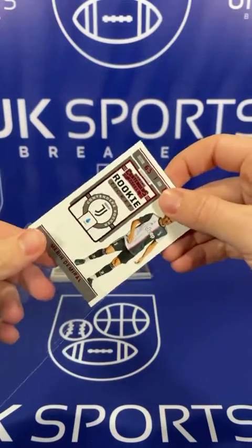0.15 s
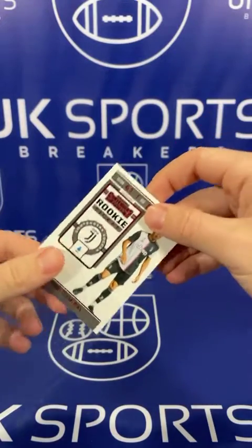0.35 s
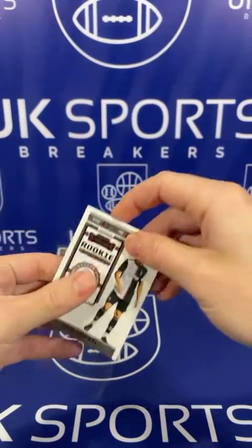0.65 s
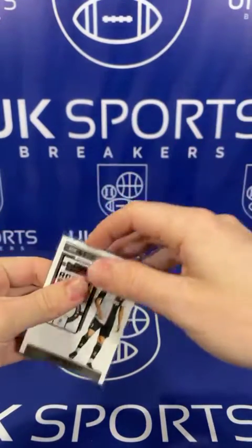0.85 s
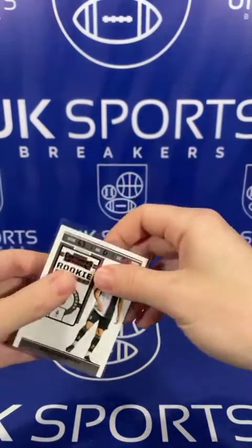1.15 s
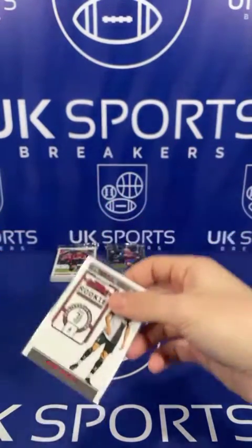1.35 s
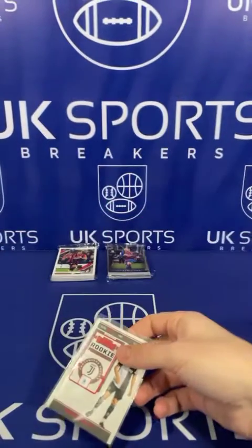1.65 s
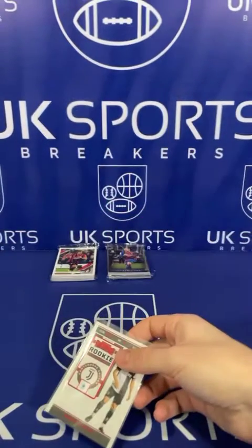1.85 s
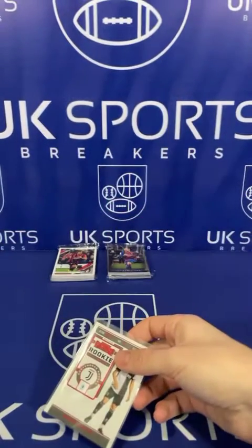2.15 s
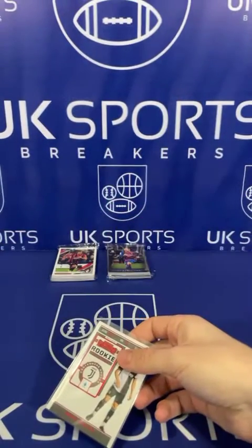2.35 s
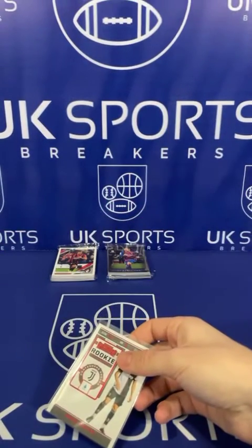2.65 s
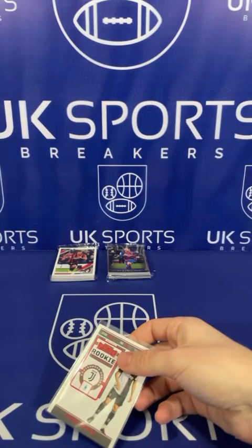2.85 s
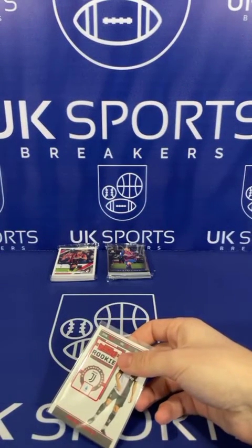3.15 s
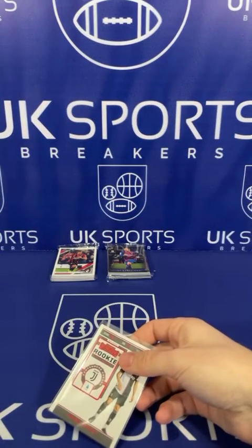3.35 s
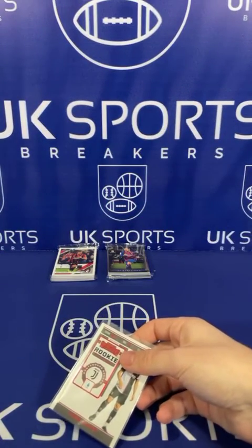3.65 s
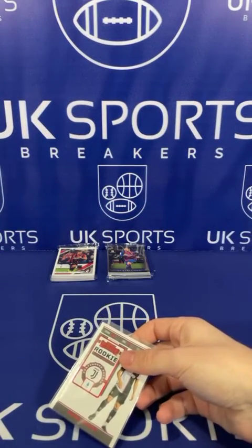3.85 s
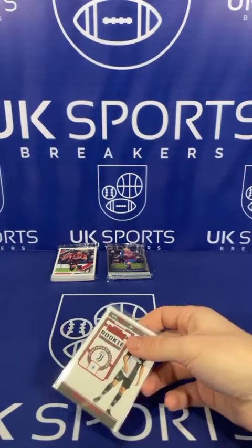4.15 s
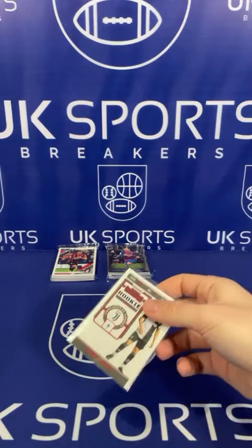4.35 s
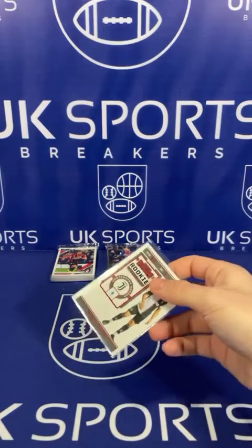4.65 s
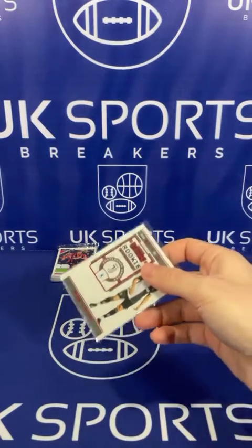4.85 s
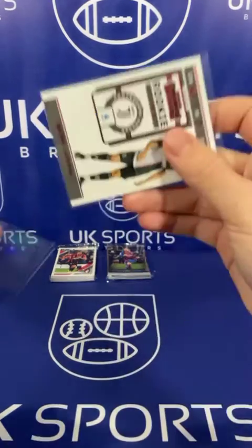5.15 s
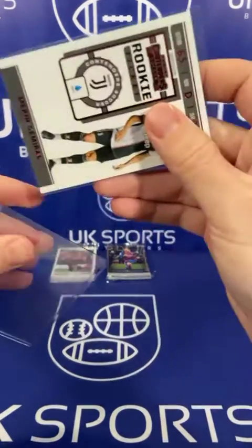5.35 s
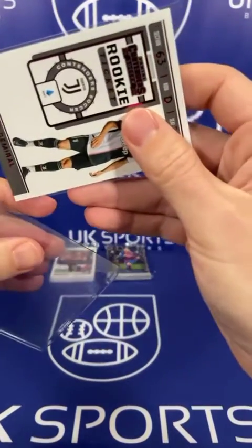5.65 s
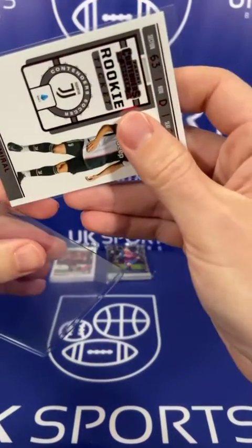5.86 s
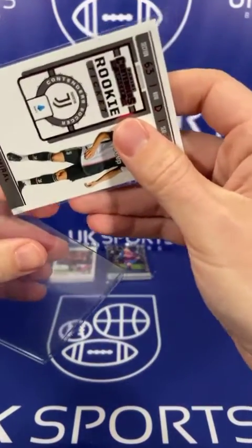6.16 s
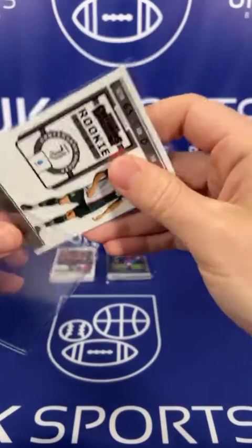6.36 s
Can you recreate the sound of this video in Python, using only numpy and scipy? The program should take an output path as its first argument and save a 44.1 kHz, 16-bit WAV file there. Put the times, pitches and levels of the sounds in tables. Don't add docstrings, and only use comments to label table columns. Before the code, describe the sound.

A small quiet room with faint vent air, soft hiss, mains hum and low rumble throughout; hands work close to a small microphone. From 0 to 1.2 s a card in a soft sleeve gives scattered dry ticks, the clearest near 0.3, 0.85 and 1.0, with thin film crackle and brief airy sweeps. A lull, then from 1.7 to 2.5 s denser clicks, rustling and dull desk knocks, strongest at 2.0, as stacked rigid holders are searched. At 2.87 s a firm click leads to a very loud, bright plastic snap at 2.98, with a short room echo. Tiny ticks follow until 3.6-3.8 s, when a rough scrape drops in pitch with clustered clacks. Around 4.4-5.0 s come set-down taps, soft rubbing and sleeve glide, then small ticks near 5.4. Near quiet follows, with light rubs and sweeps from 6.15 and crisp final ticks at 6.42 and 6.49.

```python
import sys
import numpy as np
from scipy import signal
from scipy.fft import rfft, irfft, next_fast_len
from scipy.io import wavfile
from scipy.ndimage import map_coordinates

SR = 44100
rng = np.random.default_rng(int(sys.argv[2]) if len(sys.argv) > 2 else 0)


def gain_from_db(level_db):
    decades = np.asarray(level_db, float) / 20
    return 10 ** decades


def dump(signal):
    limited = np.clip(np.atleast_2d(signal).T, -1, 1)
    pcm = np.round(limited * 32767).astype(np.int16)
    wavfile.write(sys.argv[1], SR, pcm)


N = 286650

# start_s, peak_db, top_end_db, ring_hz
CARD_TICKS = [(.1428, -37.5, -20.5, 1090), (.163, -45, -13, 1530), (.1705, -42, -24, 1460),
              (.1893, -39.5, -10.5, 1130), (.2897, -29.5, -10, 1536), (.444, -38.5, -9, 3930),
              (.4914, -40, -14, 1820), (.6087, -36.5, -7, 1140), (.7528, -42, -13, 2140),
              (.8514, -28, 0, 2170), (.861, -37.5, -21.5, 1175), (1.0007, -29.5, -3.5, 2610),
              (1.0184, -38, -0.5, 2800), (1.1262, -34, -9.5, 1100), (1.1408, -35.5, -3.5, 1510),
              (4.3923, -36, -14, 1345), (4.5428, -34.5, -11, 4700), (4.572, -35.5, -5, 5770),
              (4.6778, -42, -2.5, 1180), (4.8163, -40.5, -15, 2650), (4.912, -39.5, -12, 3940),
              (4.925, -38, -20, 3886), (4.9541, -38, -32, 1293), (5.3857, -42, -20.5, 3500),
              (5.392, -45, -23, 4800), (6.4245, -36, -15, 1520), (6.4914, -29.5, -12.5, 2600)]
# start_s, peak_db, top_end_db, ring_hz
STACK_TICKS = [(1.7199, -29, -13, 1098), (1.7615, -39, -15, 1510), (1.8153, -40.5, -37, 903),
               (1.8425, -37, -33, 1086), (1.8554, -41.5, -31, 1516), (1.9455, -39.5, -25, 2480),
               (1.9755, -37.5, -10, 2500), (1.9984, -24, -15, 940), (2.0325, -35, -8, 2080),
               (2.0641, -29, -33, 2550), (2.139, -43.5, -11, 920), (2.1626, -59, -39, 905),
               (2.385, -52.5, -24, 1000), (2.4098, -47, -37, 1900), (2.438, -47, -43, 900),
               (2.4771, -41, -51, 935), (2.5008, -49.5, -34, 1030), (2.7871, -50.5, -7, 2170)]
# start_s, peak_db, top_end_db, ring_hz
PRISE_TICKS = [(2.866, -18.5, -15.5, 1617), (2.9074, -30, -13, 882), (2.931, -32.5, -3, 1280),
               (2.974, -27, -24, 1900), (2.9816, -7, -10, 2237), (2.992, -15, -29.5, 2315),
               (3.1847, -44.5, -18, 2190), (3.2443, -58, 15.5, 2180), (3.544, -45.5, -22.5, 1174),
               (3.5895, -46, -18.5, 1695), (3.6298, -45, -25, 2850), (3.6343, -43, -10, 1840),
               (3.6676, -25.5, -26, 1305), (3.6862, -28.5, -39, 1306), (3.7085, -35, -35, 1160),
               (3.7275, -29.5, -20, 1270), (3.7518, -25, -26, 1804), (3.87, -35.5, -49, 1150),
               (3.8762, -39, -35, 1938), (3.8824, -40, -33, 1920), (3.9796, -40.5, -17, 924),
               (4.4617, -34.5, -45, 1277), (4.5036, -26, -24, 1736), (4.5132, -32.5, -27, 1158),
               (4.5196, -31, -20, 1346), (4.5295, -41, -28, 3034), (4.599, -45.5, -35, 1290)]
# freq_hz, gain_db
TICK_BODY = [(300, -27), (800, -1.5), (1300, 3), (2300, 4), (5000, -3), (8000, -16.5)]
# freq_hz, gain_db
TICK_TOP = [(2500, -36.5), (6000, -4.5), (8000, 2), (10500, -4.5), (14000, -4.5), (16000, -12)]
# start_s, peak_db, board_tone_hz
THUDS = [(0.29, -51, 384), (0.851, -46.5, 268), (1.004, -49, 490), (1.128, -48.5, 300), (1.722, -33.5, 475),
         (1.764, -34, 320), (1.784, -47, 295), (1.813, -44, 480), (1.841, -39, 490), (1.999, -28.5, 483),
         (2.031, -40, 486), (2.415, -46.5, 313), (2.478, -49, 307), (2.868, -28.5, 520.5),
         (2.885, -38.5, 496), (2.87, -38.5, 390), (2.987, -28, 493), (2.991, -29.5, 320),
         (2.998, -37.5, 139), (2.872, -38.5, 94), (3.729, -32.5, 344), (3.753, -32, 340),
         (3.872, -34.5, 650), (4.464, -35.5, 296), (4.502, -37, 265), (4.516, -33.5, 307),
         (4.535, -42, 222), (4.598, -45, 176), (4.472, -39, 121), (4.955, -42.5, 270), (5.305, -44.5, 42),
         (5.385, -52.5, 292), (5.438, -50.5, 370)]
# freq_hz, width_hz, gain_db
DESK_MODES = [(96.2, 37, -2.5), (152.3, 28.3, 4.5), (311.7, 53, 0.5), (380, 64, -1), (472, 91, -1),
              (940, 200, -8)]
# start_s, stop_s, start_db, stop_db
SWEEPS = [(0.401, 0.582, -59.5, -53.5), (0.596, 0.622, -55, -51.5), (0.743, 0.854, -60.5, -49),
          (0.85, 0.88, -49, -65), (1.114, 1.165, -60, -63), (3.608, 3.813, -66.5, -68),
          (4.241, 4.296, -61, -53), (4.896, 4.94, -62.5, -41.5), (5.594, 5.617, -74, -71.5),
          (6.26, 6.345, -68.5, -56.5), (6.332, 6.435, -58.5, -56.5), (6.428, 6.472, -70, -64)]
# start_s, stop_s, start_db, stop_db
RUBS = [(0.217, 0.291, -80, -50.5), (0.287, 0.408, -56, -68.5), (1.624, 1.655, -70, -58),
        (1.709, 1.948, -65, -66), (1.924, 2.127, -81.5, -61), (2.858, 2.862, -33, -39),
        (2.874, 2.932, -54.5, -53), (4.036, 4.158, -64, -64), (4.153, 4.224, -63, -61),
        (4.326, 4.349, -57.5, -46.5), (4.357, 4.447, -76, -60.5), (4.462, 4.476, -50.5, -44.5),
        (4.52, 4.668, -65.5, -63.5), (4.661, 4.806, -60.5, -62.5), (4.815, 4.92, -58, -66),
        (4.935, 4.968, -59, -65), (5.23, 5.251, -74, -60), (6.148, 6.27, -67, -67)]
# freq_hz, density_db_per_hz
STROKE_DULL = [(1500, -18), (3000, -4), (5000, 1), (7000, 2.5), (9000, 1.5), (12000, -24), (16000, -27)]
# freq_hz, density_db_per_hz
STROKE_BRIGHT = [(7000, -41), (10000, -4.5), (12500, -5.5), (14000, -2), (16000, -11)]
# start_s, strongest_s, stop_s, level_db
RUSTLES = [(0, 0, 0.26, -64), (0.474, 0.602, 0.58, -67), (.72, 0.737, 0.91, -66.5),
           (1.715, 1.786, 2.13, -59), (1.84, 1.85, 1.93, -60), (1.945, 1.964, 1.96, -55.5),
           (1.988, 2.017, 2.11, -53.5), (2.062, 2.09, 2.33, -64.5), (2.395, 2.441, 2.5, -63.5),
           (2.86, 2.97, 3, -75), (3.764, 3.775, 4.01, -49.5), (4.38, 4.513, 4.1, -73.5),
           (4.614, 4.72, 4.7, -65.5), (4.745, 4.79, 4.84, -68.5), (4.809, 4.836, 5.1, -61),
           (5.385, 5.403, 5.54, -63.5)]
# freq_hz, density_db_per_hz
FILM = [(290, -32), (500, 7), (588, 0), (1190, -0.5), (2170, -9), (2620, -7), (3360, -7), (3960, -7),
        (10000, -20), (13000, -47.5), (22000, -120)]
# freq_hz, width_hz, gain_db
HOLDER_MODES = [(970, 82, -4.5), (1900, 500, 9.5), (2600, 130, 4), (3700, 110, -5.5), (4960, 400, -18.5)]
# time_s, level_db, gap_resonance_hz
SCRAPE = [(3.61, -61.5, 1850), (3.63, -47, 1780), (3.65, -41, 1690), (3.667, -36.5, 1630),
          (3.683, -35.5, 1500), (3.69, -35.5, 1300), (3.73, -33, 1076), (3.745, -37, 1100),
          (3.758, -34, 1160), (3.785, -50, 1160), (3.82, -54, 1150), (3.86, -56, 1120),
          (3.875, -45.5, 1320), (3.95, -75, 1710)]
# freq_hz, density_db_per_hz
DRAG = [(240, -47), (400, -7), (655, -13), (879, -1), (1310, -15), (2360, -13), (3530, -21), (3990, -31.5),
        (8110, -23), (16000, -83)]
# freq_hz, width_hz, gain_db
RAIL_MODES = [(900, 90, 5), (1950, 340, 11), (2850, 51, 0), (3670, 200, 4.5), (4480, 300, -10.5),
              (6180, 300, -13)]
# time_s, level_db
GLIDE = [(4.655, -72), (4.7, -63), (4.725, -66.5), (4.79, -61.5), (4.803, -77), (4.82, -61), (4.87, -76),
         (4.9, -65), (4.928, -54), (4.945, -64), (4.97, -74)]
# freq_hz, width_hz, gain_db
SLEEVE_MODES = [(1196, 124.5, 2), (2670, 140, -0.5), (3800, 220, 2), (4270, 200, -3), (6000, 150, -13),
                (8700, 300, -5.5)]
# start_s,
# peak_db, pitch_hz
PRICKS = [(0.247, -57, 6070), (0.2644, -59, 6060), (.6075, -46, 13700), (.6397, -57, 6670),
          (.8515, -40, 9600), (1.019, -48, 7800), (0.6938, -48, 4630), (1.111, -57, 5230),
          (1.6439, -56.5, 14830), (2.332, -62, 4270), (2.9811, -35, 8040), (2.9822, -27.5, 15000),
          (2.9826, -23.5, 11450), (3.186, -53, 5597), (3.2445, -46, 14440), (3.2445, -47, 11470),
          (3.186, -63, 8500), (2.066, -46, 6430), (1.793, -55, 5200), (3.3414, -56.5, 5700),
          (3.35, -61.5, 3900), (3.762, -44, 5250), (3.98, -53, 5400), (3.7931, -43.5, 8540),
          (3.881, -38.5, 3370), (3.9927, -55.5, 6500), (4.2671, -39, 6630), (4.274, -48.5, 4130),
          (4.3432, -43.5, 13500), (4.5427, -42, 6000), (4.52, -43.5, 5480), (4.9055, -41, 12700),
          (5.171, -62.5, 8100), (5.2467, -61.5, 5500), (5.254, -60, 5470), (5.2836, -57, 5700),
          (5.3453, -63.5, 6600), (5.361, -59, 4710), (5.4976, -62, 4580), (6.16, -61, 6340),
          (6.352, -52.5, 8900)]
# time_s, gain_db
REACH = [(0, -7), (1.4, -12.5), (1.7, -5.5), (2.7, -1), (2.9, -2), (3.1, 5), (3.2, -11.5), (3.55, -1.5),
         (4.6, -5.5), (5.2, -11)]
# freq_hz, t60_s
WALLS = [(150, .33), (600, .3), (2000, .25), (5000, .22), (9000, .23), (14000, .22)]
# freq_hz, density_db_per_hz
AIR = [(30, -30), (45, -20.5), (70, -9), (151, -9.5), (269, -16), (303, -9.5), (375, -17.5), (484, -22.5),
       (600, -23.5), (900, -36.5), (1170, -70), (1980, -120)]
# freq_hz, density_db_per_hz
HISS = [(500, -31.5), (800, -1), (1400, -2), (2200, -2.5), (4000, -9), (7000, -14), (10000, -17),
        (11500, -13.5), (16000, -17.5)]
# freq_hz, level_db_rms
HUM = [(100.6, -61.5), (300, -66.5), (199.4, -72.5)]
# centre_s, length_s, extra_deep_db, extra_desk_db
LEANS = [
    (0.713, 0.031, 0, 9.5),
    (1.177, 0.22, 11.5, 2),
    (1.8, 0.04, 4, 18),
    (2.616, 0.036, 1, 5),
    (2.903, 0.026, 12, 3),
    (3.022, 0.073, -8, 9),
    (3.774, 0.13, 0, 14.5),
    (4.514, 0.082, 8, 10),
    (4.983, 0.034, 6.5, 7.5),
    (5.325, 0.036, 10.5, -0.5),
]


def unit(x):
    return x / np.sqrt(np.mean(x ** 2) + 1e-20)


def along(points, hz):
    f, v = np.transpose(points)
    return np.interp(np.log(hz + 1), np.log(f + 1), v)


def curves(rows):
    s, *cols = np.transpose(rows)
    return [np.interp(np.arange(N) / SR, s, c) for c in cols]


def gated(spans):
    gain = np.zeros(N)
    for span in spans:
        before, after = (span[0][0] - .01, -100), (span[-1][0] + .02, -100)
        s, db = np.transpose([before, *span, after])
        k = np.arange(max(round(s[0] * SR), 0), min(round(s[-1] * SR), N))
        gain[k] += gain_from_db(np.interp(k / SR, s, db))
    return gain


def wobble(rate_hz):
    knots = rng.standard_normal(int(N * rate_hz / SR) + 4)
    return map_coordinates(knots, [np.arange(N) * rate_hz / SR])


def filtered(x, response):
    m = next_fast_len(N + SR // 2)
    return irfft(rfft(x, m) * response(np.fft.rfftfreq(m, 1 / SR)), m)[..., :N]


def causal(x, points):
    cepstrum = irfft(np.log(gain_from_db(along(points, np.fft.rfftfreq(2048, 1 / SR))) + 1e-6))
    cepstrum[1:1024] *= 2
    cepstrum[1025:] = 0
    return signal.fftconvolve(x, irfft(np.exp(rfft(cepstrum))))[:N]


def resonance(hz, width_hz):
    return lambda f: 1j * f * width_hz / (hz * hz - f * f + 1j * f * width_hz)


def modes(table):
    return lambda f: sum((-1) ** k * gain_from_db(db) * resonance(hz, width_hz)(f)
                         for k, (hz, width_hz, db) in enumerate(table))


def friction(spectrum, grit_db, grit_rate_hz):
    grit = gain_from_db(grit_db * wobble(grit_rate_hz)) * rng.standard_normal(N)
    return unit(filtered(grit, lambda hz: gain_from_db(along(spectrum, hz))))


def bounced(x):
    delay_s, sway_s, bounce_db = 0.000675, 0.00005, -14.5
    late = np.arange(N) - SR * (delay_s + sway_s * wobble(2.4))
    return (x + gain_from_db(bounce_db) * map_coordinates(x, [late])) / np.sqrt(1 + gain_from_db(2 * bounce_db))


def ticks():
    near, blows, ring = np.zeros((2, N + SR)), np.zeros((2, N + SR)), np.zeros(N + SR)
    t = np.arange(SR // 10) / SR
    strain_s, strain_db = 0.0028, -22
    # t60_s, ring_db, ring_db lost per dB of blow
    groups = [(CARD_TICKS, (0.014, -11, 0.24)), (STACK_TICKS, (0.022, -7, 0.24)), (PRISE_TICKS, (0.012, -5, 0.22))]
    for s, db, top_db, hz, t60_s, ring_db, lost in [(*row, *rings) for rows, rings in groups for row in rows]:
        k = round(s * SR)
        over_db = db + 35
        hard_db = db + max(top_db, 0)
        life_s = max(t60_s * (1 + 0.017 * over_db), .003)
        ring_db = ring_db - lost * over_db - 0.22 * (top_db + 16)
        rise = 1 - np.exp(-t / (0.0019 * gain_from_db(-.3 * (hard_db + 44.5))))
        size = gain_from_db([[db], [db + top_db + 10]])

        fall = gain_from_db(-60 * t / [[life_s], [min(0.94 * life_s, .008)]])
        near[:, k:k + len(t)] += size * rise * fall * rng.standard_normal((2, len(t)))

        creak = size * gain_from_db(strain_db + 0.38 * (db + 15)) * [[1], [.4]]
        growth = np.exp(-t[::-1] / strain_s)
        near[:, k - len(t):k] += creak * growth * rng.standard_normal((2, len(t)))

        near[:, k + 3] += size[:, 0] * gain_from_db(0.33 * hard_db + 9.5) * [1, 2.2]
        blows[:, k] += size[:, 0] * gain_from_db([0, -4]) * np.sqrt(life_s * SR / 30)

        phase = 2 * np.pi * hz * t + np.cumsum(0.14 * rng.standard_normal(len(t)))
        ring[k:k + len(t)] += gain_from_db(db + ring_db - 60 * t / (2.62 * life_s)) * rise * np.sin(phase)

    def colour(x):
        return causal(x[0], TICK_BODY) - causal(x[1], TICK_TOP)

    return bounced(colour(near)) + ring[:N], colour(blows) + 0.6 * ring[:N]


def thuds():
    board, push, t = np.zeros(N + SR), np.zeros(N + SR), np.arange(SR // 4) / SR
    for s, db, hz in THUDS:
        k = round(s * SR)
        life_s = min(20.4 / hz, .12)
        tone = np.sin(2 * np.pi * hz * t) * (1 - np.exp(-t / 0.0019))
        board[k:k + len(t)] += gain_from_db(db + 1 - 60 * t / life_s) * tone
        shove = gain_from_db(db + 15.5 - 60 * t / (0.51 * life_s)) * min(hz / 200, 1) ** 2
        push[k:k + len(t)] += shove * rng.standard_normal(len(t))
    return board[:N] + filtered(push[:N], modes(DESK_MODES))


def strokes():
    dull, bright = np.zeros(N), np.zeros(N)
    sweep_bright_db, rub_bright_db = 4, 0
    rows = [(*row, sweep_bright_db) for row in SWEEPS] + [(*row, rub_bright_db) for row in RUBS]
    for start_s, stop_s, start_db, stop_db, bright_db in rows:
        first = round(start_s * SR)
        k = np.arange(first, max(round(stop_s * SR), first + 1))
        t = k / SR
        contact = np.clip(np.minimum((t - start_s) / 0.0091, (stop_s - t) / 0.01), 0, 1)
        level = contact * gain_from_db(np.interp(t, [start_s, stop_s], [start_db, stop_db]))
        dull[k] += level * gain_from_db(-bright_db - 3.5)
        bright[k] += level * gain_from_db(bright_db - 5.5)
    skin = dull * friction(STROKE_DULL, grit_db=2, grit_rate_hz=500)
    skin += bright * friction(STROKE_BRIGHT, grit_db=1.6, grit_rate_hz=700)
    return gain_from_db(.8 * wobble(45)) * bounced(skin)


def rustles():
    creep_db, settle_db = 0.5, 20.5
    film = friction(FILM, grit_db=4.2, grit_rate_hz=750)
    film = unit(film + 1.28 * filtered(film, modes(HOLDER_MODES)))
    spans = [[(start_s, db - creep_db), (peak_s, db), (stop_s, db - settle_db)]
             for start_s, peak_s, stop_s, db in RUSTLES]
    return gated(spans) * gain_from_db(0.93 * wobble(55)) * film


def scrape():
    level = gated([[row[:2] for row in SCRAPE]])
    gap_hz = curves(SCRAPE)[1]
    rough = friction(DRAG, grit_db=-5.5, grit_rate_hz=530)
    grit = friction([(100, 0)], grit_db=4.0, grit_rate_hz=450)
    gap = np.zeros(N)
    for hz in 1000 * 1.12 ** np.arange(7):
        share = np.exp(-(np.log(gap_hz / hz) / 0.13) ** 2)
        gap += share * unit(filtered(grit, resonance(hz, 110)))
    body = unit(filtered(grit, modes(RAIL_MODES)))
    return level * gain_from_db(-2 + 0.48 * wobble(77)) * (0.42 * rough + 0.66 * gap + 0.48 * body)


def glide():
    grit = friction([(100, 0)], grit_db=2.5, grit_rate_hz=600)
    return gated([GLIDE]) * gain_from_db(1.5 * wobble(55)) * unit(filtered(grit, modes(SLEEVE_MODES)))


def pricks():
    out, t, t60_s = np.zeros(N + SR), np.arange(SR // 25) / SR, 0.014
    for s, db, hz in PRICKS:
        k = round(s * SR)
        drift = np.cumsum(0.26 * rng.standard_normal(len(t)))
        fall = gain_from_db(db + 3.5 - 60 * t / t60_s) * (1 - np.exp(-t / 0.00012))
        out[k:k + len(t)] += fall * np.sin(2 * np.pi * hz * t + drift)
    return out[:N]


def room(x):
    out, step, delay = np.zeros(N + SR), int(.3 * SR), 90
    for k in range(0, N, step):
        hz, t, z = signal.stft(rng.standard_normal(SR // 2), SR, nperseg=256)
        decay = gain_from_db(-60 * t / along(WALLS, hz)[:, None])
        tail = signal.istft(z * decay, SR, nperseg=256)[1]
        wet = signal.fftconvolve(x[k:k + step], tail / np.linalg.norm(tail))
        out[k + delay:k + delay + len(wet)] += wet
    return out[:N]


def background():
    t = np.arange(N) / SR
    air_db, hiss_db = -62, -69.5
    deep_db, desk_db = np.full(N, -60.5), np.full(N, -62.5)
    for s, length_s, extra_deep_db, extra_desk_db in LEANS:
        lean = np.exp(-((t - s) / length_s) ** 2)
        deep_db += lean * extra_deep_db
        desk_db += lean * extra_desk_db
    air = gain_from_db(air_db + 2.5 + .2 * wobble(3)) * friction(AIR, grit_db=0, grit_rate_hz=30)
    air += gain_from_db(hiss_db) * friction(HISS, grit_db=0, grit_rate_hz=30)
    hum = np.zeros(N)
    for hz, db in HUM:
        level = np.sqrt(2) * gain_from_db(db + 3 * wobble(7.5))
        hum += level * np.sin(2 * np.pi * hz * t + 0.6 * wobble(8.5))
    deep = unit(filtered(rng.standard_normal(N), lambda f: resonance(57, 20)(f) ** 2))
    deep = unit(deep + 1.1 * np.sin(2 * np.pi * 59.5 * t + 1.5 * wobble(3.9)))
    desk = unit(filtered(rng.standard_normal(N), lambda f: resonance(144, 16)(f) ** 2))
    return air + hum + gain_from_db(deep_db) * deep + gain_from_db(desk_db + 1.0) * desk


def scene():
    near, blows = ticks()
    bumps = thuds()
    rubs = strokes() + rustles() + scrape() + glide()
    small = pricks()
    knocks = gain_from_db(-1.5) * blows + gain_from_db(-6) * small + bumps
    wet = room(gain_from_db(curves(REACH)[0]) * knocks + gain_from_db(-10.5) * rubs)
    return (near + small + bumps + rubs + wet + background())[None]


def low_pass(x):
    return signal.sosfilt(signal.butter(12, 16970, fs=SR, output="sos"), x)


def record(dry):
    low_hz, top_hz, ceiling = 26, 15850, .45
    held = dry / (1 + np.abs(dry / ceiling) ** 4) ** .25
    mix = filtered(held, lambda f: (1j * f / (low_hz + 1j * f)) ** 2 * (f < top_hz))
    return low_pass(mix)


dry = scene()
out = record(dry)
dump(out)
```